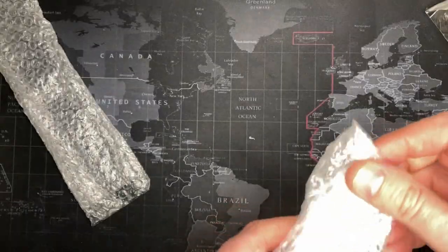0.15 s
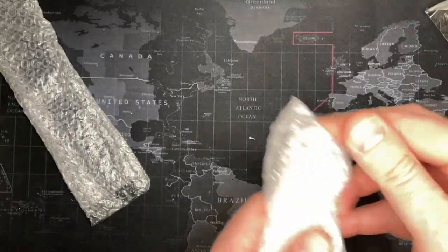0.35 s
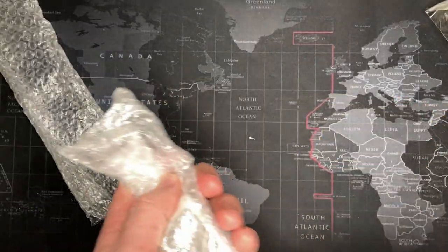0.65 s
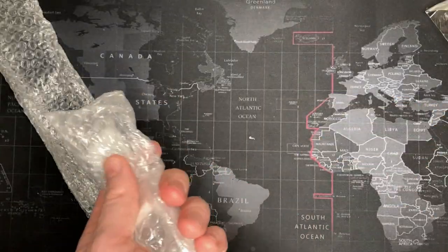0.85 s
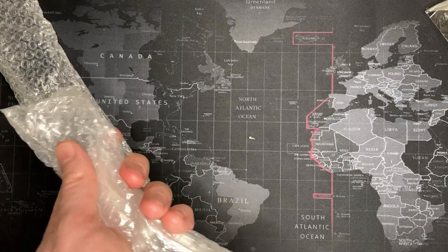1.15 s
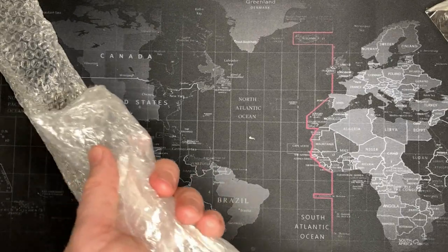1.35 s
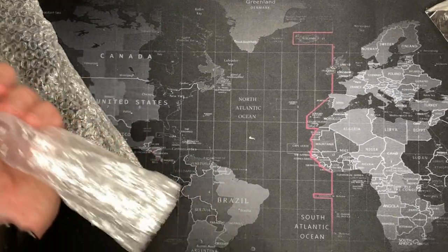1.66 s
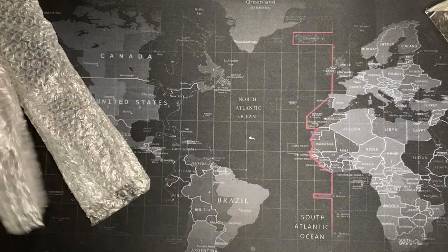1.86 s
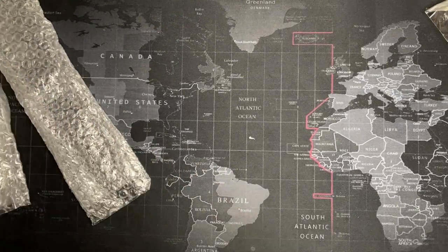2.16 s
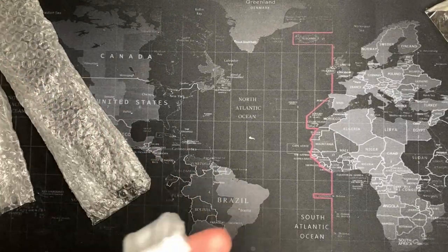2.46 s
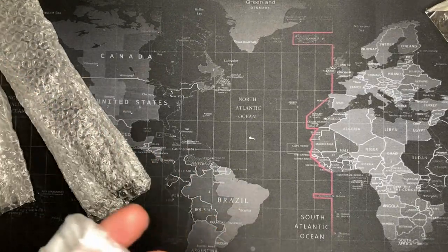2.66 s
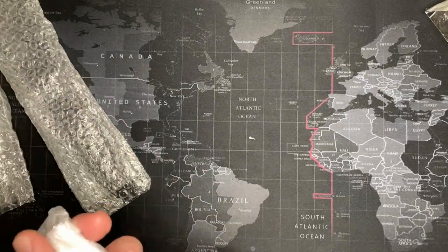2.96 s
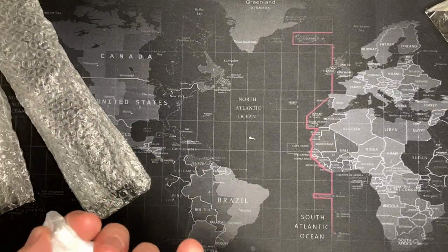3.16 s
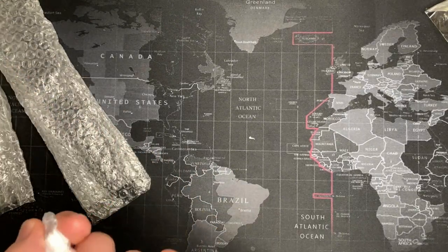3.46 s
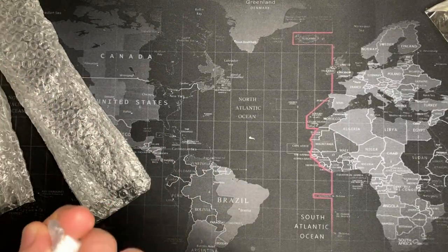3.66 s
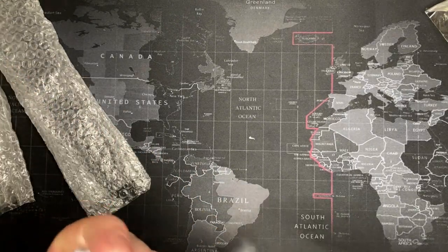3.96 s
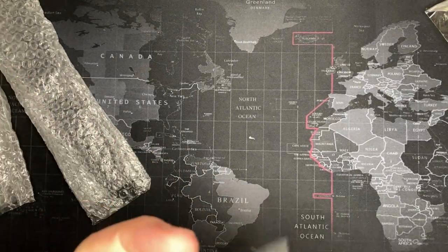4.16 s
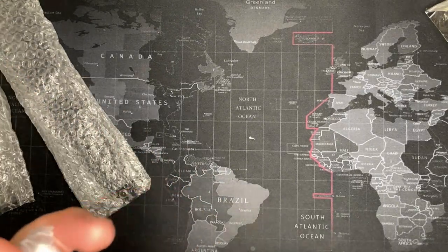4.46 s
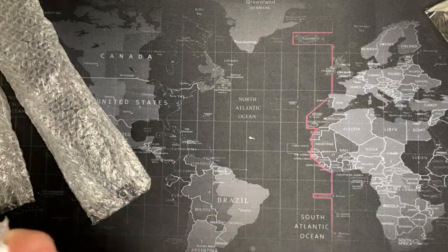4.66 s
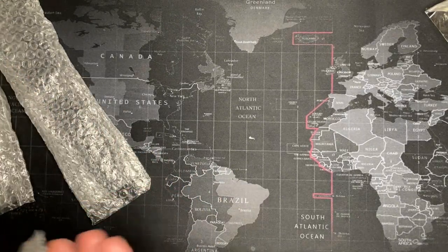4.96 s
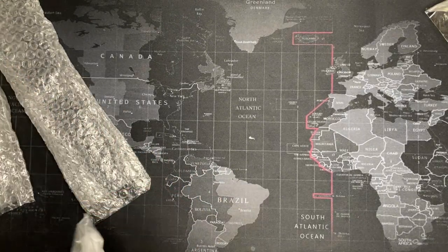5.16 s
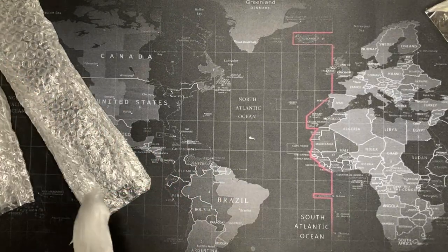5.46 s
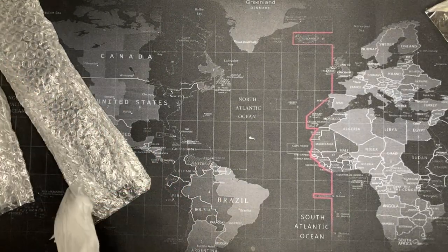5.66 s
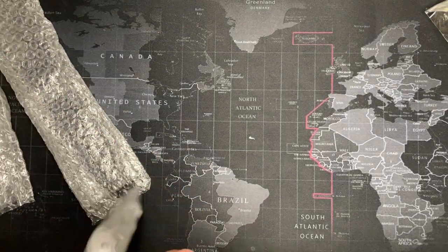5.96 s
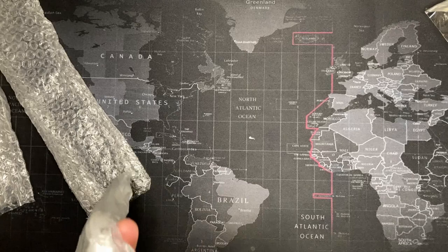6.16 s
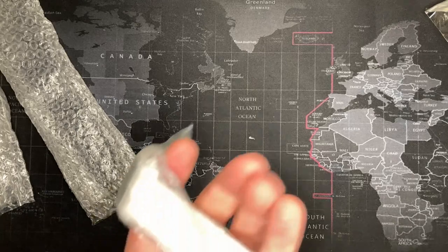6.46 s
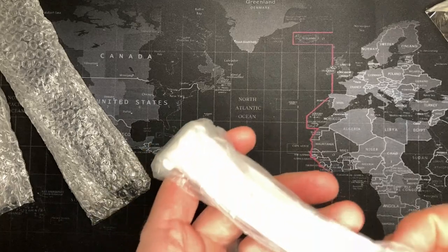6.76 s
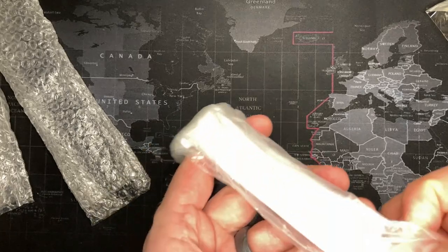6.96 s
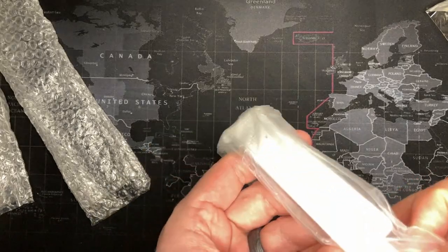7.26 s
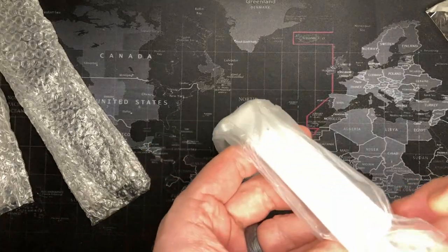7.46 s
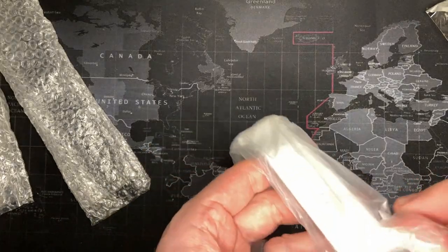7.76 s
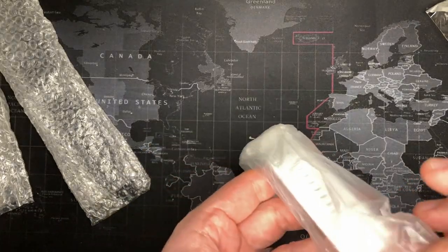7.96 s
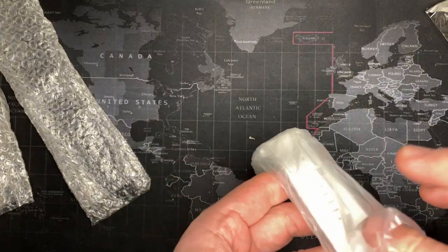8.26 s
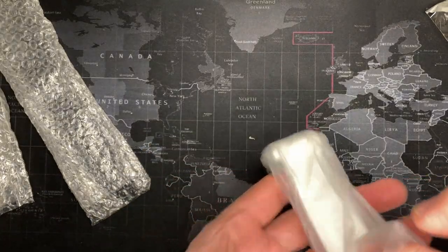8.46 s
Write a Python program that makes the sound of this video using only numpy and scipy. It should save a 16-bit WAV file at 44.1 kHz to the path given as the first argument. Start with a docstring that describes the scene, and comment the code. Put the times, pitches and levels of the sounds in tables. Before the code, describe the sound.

Hands work a thin plastic sleeve and bubble wrap over a desk mat, very close to a stereo microphone in a quiet room. From 0 s, bright dry crackle of tiny buckling creases, with sharp snaps and duller finger rustle, comes in uneven stretches, dipping briefly near 0.7 s. It rises again around 1.5 s, and a low rumble swells near 1.7 s as something touches the desk. The crackle thins around 2 s, bursts back at about 2.25 s, and continues moderately with scattered clicks. From 3.7 to 4.9 s it is strong and dense, with loud snaps. A softer, sparser rustle follows until about 6 s. Firm crinkling then returns, with hard snaps around 6.7 and 7.5 to 7.8 s and small crunchy bumps. From 7.9 s short, choppy crackles continue to the end at about 8.6 s, over faint low room tone and hiss.

```python
"""Hands squeeze, turn and slide bubble wrap and a thin plastic sleeve over a desk mat, close to a stereo microphone.
The film crackles from the start as swarms of tiny creases buckle, with sharper snaps, dull rustle and soft bumps.
The room's low rumble swells near 1.7 s; the crackle thins around 2 s, then grows and is strong from 3.7 to 4.9 s.
A softer stretch follows to about 6 s; then firm crackle and loud snaps return, and short, choppy crackle ends it.
Creases and snaps are noise bursts tinted by patches of film, the bumps are ringing puffs, the room is shaped noise."""
import sys
import numpy as np
from scipy import signal
from scipy.fft import rfft, irfft, next_fast_len
from scipy.io import wavfile
from scipy.ndimage import uniform_filter1d, map_coordinates

SR = 44100
rng = np.random.default_rng(int(sys.argv[2]) if len(sys.argv) > 2 else 0)


def master(y):
    """Save y as 16-bit WAV."""
    cut = np.clip(np.atleast_2d(y).T, -1, 1)
    pcm = np.round(cut * 32767)  # scale
    wavfile.write(sys.argv[1], SR, pcm.astype(np.int16))


N = 380141
PIVOT_DB = -26.5   # crackle level about which rustle level and crease rate swing


def handling():
    """Crackle level in dB: stretches slide from one level to another; the louder wins where they meet."""
    # crackle level in stretches: start [t/s], length [t/s], level at start [level/dB], level at end [level/dB]
    stretches = [(0.002, 0.2, -41.5, -33), (0.197, 0.16, -36.5, -40.0), (0.323, 0.23, -34.0, -36.5),
                 (0.575, 0.09, -35.5, -48.5), (0.669, 0.21, -51, -33.5), (0.867, 0.39, -33.5, -36.5),
                 (1.19, 0.07, -30.5, -37), (1.255, 0.25, -40.5, -28.5), (1.486, 0.36, -28, -33.5),
                 (1.83, 0.016, -43, -45), (1.854, 0.054, -34, -45.5), (1.915, 0.12, -37, -44),
                 (2.231, 0.043, -42, -24.5), (2.274, 0.14, -30, -26.5), (2.41, 0.16, -27, -30),
                 (2.56, 0.2, -36.5, -35.5), (2.712, 0.152, -33.0, -36.5), (2.871, 0.068, -30.0, -39.5),
                 (2.935, 0.097, -35.5, -34.5), (3.04, 0.13, -37, -34.5), (3.165, 0.24, -39, -39),
                 (3.434, 0.062, -37, -26.5), (3.513, 0.091, -26.5, -42), (3.606, 0.1, -42.5, -30.5),
                 (3.709, 0.056, -32, -37), (3.761, 0.057, -37.5, -25.0), (3.817, 0.09, -32.5, -22.5),
                 (3.912, 0.036, -29, -41), (3.955, 0.059, -27.5, -27.5), (4.02, 0.063, -34.5, -45.5),
                 (4.109, 0.056, -32.5, -42), (4.167, 0.029, -32, -47), (4.204, 0.037, -32, -23),
                 (4.246, 0.28, -23.5, -30.5), (4.497, 0.4, -24.0, -39), (4.871, 0.085, -34.5, -28.5),
                 (4.963, 0.13, -31.5, -34), (5.096, 0.1, -30, -37.5), (5.202, 0.16, -35.5, -33.0),
                 (5.366, 0.031, -43.5, -36), (5.403, 0.087, -32.5, -38.5), (5.479, 0.16, -32.5, -43),
                 (5.636, 0.19, -42.0, -38), (5.817, 0.24, -40.5, -30.5), (6.046, 0.059, -33, -38),
                 (6.113, 0.2, -38.5, -28.5), (6.322, 0.062, -32, -32), (6.383, 0.17, -28, -37),
                 (6.526, 0.26, -27.5, -30.5), (6.775, 0.108, -39.5, -25), (6.891, 0.039, -25.5, -33.5),
                 (6.94, 0.071, -44, -39.5), (6.992, 0.19, -44.5, -27.5), (7.184, 0.095, -32.5, -31),
                 (7.289, 0.052, -27, -42.5), (7.353, 0.095, -30, -41), (7.436, 0.12, -40, -29.5),
                 (7.577, 0.29, -26.0, -41.5), (7.89, 0.016, -39, -42), (7.916, 0.053, -43, -35),
                 (7.974, 0.028, -36.5, -32.5), (8.004, 0.018, -31.5, -36), (8.032, 0.048, -37.0, -33),
                 (8.084, 0.018, -32, -34), (8.104, 0.035, -35.5, -36.5), (8.14, 0.018, -37.0, -36),
                 (8.155, 0.12, -32, -29), (8.287, 0.097, -36, -32.5), (8.38, 0.021, -35.5, -36),
                 (8.402, 0.027, -35, -41.5), (8.433, 0.053, -44, -27), (8.486, 0.079, -28, -35.5),
                 (8.576, 0.016, -37, -37), (8.598, 0.02, -37, -33)]
    rise_db_per_s, fall_db_per_s = 1500, 1200   # slopes before and after a stretch
    at_rest_db = -47.5   # lowest level, the film merely held
    t = np.arange(0, N + 32, 32) / SR
    level_db = np.full(len(t), at_rest_db)
    for start, length, start_db, end_db in stretches:
        end = start + length
        slide_db = np.interp(t, [start, end], [start_db, end_db])
        rise_db = rise_db_per_s * np.maximum(start - t, 0)
        fall_db = fall_db_per_s * np.maximum(t - end, 0)
        level_db = np.maximum(level_db, slide_db - rise_db - fall_db)
    return np.interp(np.arange(N) / SR, t, level_db)


def film_crackle(crackle_db, full_db):
    """Thin film buckles crease by crease in short bright bursts; creases crowd as the crackle grows louder."""
    # spectrum of the crackling film before its fullness: frequency [f/Hz], gain [level/dB]
    film_spectrum = [(500, -36), (1200, -7.5), (2000, -10.5), (4000, -5.5), (6500, -6.5), (7800, -3.5),
                     (8300, 0.2), (10500, 0.05), (13000, -2), (16000, 2.5)]
    creases_per_s, follow = 3000, 0.3   # mean rate at the pivot level; dB of rate per dB of crackle
    per_s = creases_per_s * amp(follow * (crackle_db - PIVOT_DB))
    # the wide spread makes creases differ in strength
    creases = swarm(per_s, spread_db=3.9, clump_db=1.0, burst_ms=0.43,
                    low_hz=2070, high_hz=12400, even_s=0.0294)
    film = colour(creases, film_spectrum)
    film = film + (amp(full_db) - 1) * resonate(film, 2250, 3000)
    return amp(crackle_db) * film


def swarm(per_s, spread_db, clump_db, burst_ms, low_hz, high_hz, even_s):
    """Creases buckle in clumps: each is a swelling and dying noise burst, tinted by the patch of film it shakes."""
    busy = amp(clump_db * (drift(60) + drift(14)))
    happens = rng.random(N) < per_s * busy / SR
    power = happens * amp(2 * spread_db * np.minimum(rng.exponential(1, N), 4.0))
    patches = np.geomspace(low_hz, high_hz, num=8)
    dealt = rng.integers(0, 8, N)   # which patch each crease shakes
    fade = np.exp(-2000 / (burst_ms * SR))   # of power, twice as fast as amplitude
    out = np.zeros(N)
    for k, hz in enumerate(patches):
        envelope = np.sqrt(signal.lfilter([1], [1, -2 * fade, fade ** 2], power * (dealt == k) + 1e-12))
        burst = envelope * rng.standard_normal(N)
        tinted = resonate(burst, hz, 0.55 * hz) * np.sqrt(high_hz / hz)
        out += 0.15 * burst + tinted
    # slow chance swells of the random bursts are evened, so the level follows the curve applied afterwards
    return out / np.sqrt(uniform_filter1d(out ** 2, int(even_s * SR)) + 1e-9)


def ticks(crackle_db):
    """Lone sharp bright creases: random clicks of dying noise over the whole range, then weighted to the treble."""
    per_s, spread_db, burst_ms = 300, 1.5, 0.18
    from_hz, below_crackle_db = 4460, -0.5
    happens = rng.random(N) < per_s / SR
    sizes = happens * amp(spread_db * np.minimum(rng.exponential(1, N), 4))
    fade = np.exp(-1000 / (burst_ms * SR))
    clicks = signal.lfilter([1], [1, -fade], sizes + 1e-9) * rng.standard_normal(N)
    bright = colour(clicks, [(from_hz / 4, -30), (from_hz, -6), (10500, 0.5), (16000, 1.5)])
    return amp(crackle_db + below_crackle_db) * bright


def chance_snaps(crackle_db):
    """Times and levels of further snaps at random moments, their strength led by the crackle level there."""
    per_s, over_crackle_db, spread_db = 20, -5.5, -2.5
    when, size = rng.random((400, 2))[:int(per_s * N / SR)].T
    around_db = crackle_db[(when * N).astype(int)]
    # log of a uniform draw is negative, so the negative spread lifts a few snaps far up
    level_db = around_db + over_crackle_db + spread_db * np.log(size + 1e-3)
    return np.transpose([when * N / SR, level_db])


def snaps(crackle_db):
    """A sharp click tinted by its patch of film and a short noisy burst, amid ragged lesser shocks before and after."""
    # the snaps that stand out most from the crackle around them, ahead of the path gains:
    # time [t/s], energy as a level over 2 ms [level/dB]
    clear_snaps = [(0.0499, -29.0), (0.3354, -25.0), (0.395, -28.5), (0.494, -28.0), (0.5646, -29.5),
                   (0.7188, -36.5), (0.734, -35.0), (0.7703, -33.5), (0.7852, -34.5), (0.8823, -23.5),
                   (0.8958, -23.5), (1.0231, -27.0), (1.3122, -28.5), (1.6104, -22.5), (1.6883, -23.5),
                   (1.7521, -27.0), (1.8043, -25.0), (1.8782, -30.5), (1.9306, -29.0), (1.9948, -29.5),
                   (2.0451, -35.0), (2.0651, -40.0), (2.0849, -37.0), (2.1403, -31.0), (2.1772, -33.5),
                   (2.2134, -30.5), (2.5846, -26.0), (2.6392, -27.0), (2.789, -27.5), (2.8482, -27.0),
                   (2.8702, -21.0), (2.8757, -24.0), (2.9049, -26.0), (2.9412, -24.0), (3.0339, -24.5),
                   (3.1211, -28.5), (3.1663, -30.0), (3.2071, -31.5), (3.214, -27.5), (3.2418, -28.0),
                   (3.3426, -29.0), (3.4169, -33.0), (3.4371, -25.5), (3.4817, -22.0), (3.5152, -20.5),
                   (3.5524, -25.0), (3.571, -30.5), (3.5844, -31.0), (3.6185, -31.0), (3.6532, -24.5),
                   (3.8405, -24.5), (3.925, -27.5), (3.9742, -22.0), (3.9818, -20.0), (4.0213, -26.0),
                   (4.0712, -26.0), (4.1054, -22.5), (4.1268, -25.5), (4.1448, -28.5), (4.1646, -30.5),
                   (4.1835, -25.0), (4.2384, -18.5), (4.3641, -20.0), (4.3879, -19.5), (4.4034, -21.5),
                   (4.491, -19.0), (4.6753, -21.0), (4.8296, -28.0), (4.8474, -27.0), (5.2204, -30.5),
                   (5.2296, -28.0), (5.3112, -27.5), (5.4285, -24.0), (5.4819, -28.5), (5.5863, -32.0),
                   (5.6357, -32.5), (5.646, -33.0), (5.6715, -31.5), (5.7417, -25.5), (5.8679, -29.0),
                   (5.8837, -27.5), (5.9011, -29.0), (5.9903, -26.0), (6.0347, -24.0), (6.0462, -24.0),
                   (6.0714, -26.5), (6.1771, -28.0), (6.1925, -27.5), (6.376, -25.0), (6.4824, -22.5),
                   (6.5034, -29.5), (6.534, -23.5), (6.7051, -22.5), (6.7154, -21.0), (6.7442, -21.0),
                   (6.8273, -30.0), (6.8427, -21.5), (6.8902, -21.0), (6.9286, -27.5), (6.9532, -27.5),
                   (6.9644, -30.0), (6.991, -29.0), (7.0045, -26.5), (7.0253, -30.5), (7.071, -27.5),
                   (7.0805, -29.0), (7.0999, -25.5), (7.2865, -21.0), (7.3582, -21.5), (7.4599, -28.5),
                   (7.4732, -29.5), (7.4854, -24.0), (7.4937, -27.5), (7.5194, -28.0), (7.529, -21.0),
                   (7.5702, -19.0), (7.6302, -20.0), (7.645, -22.5), (7.6737, -23.5), (7.7066, -27.0),
                   (7.7671, -18.0), (7.7972, -29.0), (7.8179, -32.5), (7.8667, -30.0), (7.8959, -31.5),
                   (7.9205, -21.5), (8.037, -31.0), (8.0705, -22.0), (8.0943, -27.5), (8.1484, -24.5),
                   (8.1888, -24.5), (8.279, -24.5), (8.3016, -26.5), (8.3446, -26.5), (8.4015, -30.0),
                   (8.4244, -32.5), (8.4608, -28.0), (8.5451, -23.0), (8.5784, -27.5)]
    rows = [*chance_snaps(crackle_db), *clear_snaps]
    burst_ms, swell_ms, before_ms, after_ms = 0.69, 0.5, 8.2, 8.5   # decay and rise times
    fuzz, edge, ring, shock_db = 0.25, 0.98, 2.5, -16.5
    lead, window = 256, .002 * SR   # samples
    tints = 11300 * 2 ** (rng.random(len(rows)) - .6)   # Hz
    out = np.zeros(N + 2048)
    t = (np.arange(1024) - lead) / SR
    noise, chance = np.moveaxis(rng.standard_normal((len(rows), 2, 1024)), 1, 0)
    size = np.abs(chance)
    near = np.exp(-np.abs(t) * 1000 / np.where(t < 0, before_ms, after_ms))
    shocks = amp(shock_db) * size * (size > 2.4) * near   # only rare large draws
    swell = (t < 0) * np.exp(np.minimum(t, 0) * 1000 / swell_ms)
    fade = np.exp(-1000 / (burst_ms * SR))
    envelope = swell + signal.lfilter([1], [1, -fade], shocks + (t == 0))
    bursts = fuzz * noise * envelope + (t == 0)
    thin = signal.butter(2, 2500, "high", fs=SR, output="sos")   # thin film radiates no bass
    for (s, level_db), hz, burst in zip(rows, tints, bursts):
        tinted = edge * np.diff(burst, prepend=0) + ring * resonate(burst, hz, 0.45 * hz)
        hit = signal.sosfilt(thin, tinted)
        out[round(s * SR):][:1024] += amp(level_db) * hit * np.sqrt(window / np.sum(hit ** 2))
    return out[lead:lead + N]


def rustle(crackle_db, rustle_db, bass_db):
    """Fingers and wrapped item rub more dully: longer, lower bursts that follow most of the crackle's swing."""
    # spectrum of the rubbing before its bass: frequency [f/Hz], gain [level/dB]
    rub_spectrum = [(80, -19), (180, -12), (400, -5.5), (800, -0.5), (1400, 3.5), (2200, 7.5), (4000, -49)]
    follow = 0.89   # share of the crackle's swing about the pivot level
    rubs = swarm(600, spread_db=2.0, clump_db=4, burst_ms=3.9, low_hz=200, high_hz=1660, even_s=0.12)
    rub = colour(rubs, rub_spectrum)
    rub = rub + (amp(bass_db) - 1) * resonate(rub, 200, 295)
    return amp(PIVOT_DB + follow * (crackle_db - PIVOT_DB) + rustle_db) * rub


def bumps():
    """A dying puff of noise rings briefly at the pitch of each bump, with a broad crack above."""
    # soft bumps and crunches of fingers and item: time [t/s], peak before the common lift [level/dB], pitch [f/Hz]
    touches = [(0.228, -50, 213), (0.335, -34, 328), (1.472, -43, 550), (1.801, -49, 330),
               (1.984, -48, 700), (2.264, -45, 751), (2.725, -47, 780), (3.372, -46, 600),
               (3.782, -42, 830), (4.236, -44, 870), (4.819, -49, 520), (5.224, -44, 865),
               (5.403, -48.5, 791), (6.831, -40, 1330), (6.869, -43, 1420), (6.875, -43.5, 516),
               (6.965, -45.5, 810), (7.138, -50, 373), (7.351, -45, 820), (7.616, -46, 587),
               (7.62, -34, 2200), (7.671, -38, 1510), (7.735, -46, 400), (7.753, -38, 1200),
               (7.77, -43, 700), (7.894, -46, 510), (8.01, -36, 2100), (8.04, -41, 1230),
               (8.067, -41, 1280), (8.09, -47, 355), (8.147, -46, 417), (8.307, -45.5, 783),
               (8.478, -49, 899)]
    burst_ms, width, crack, lift_db = 8.0, 0.44, 0.5, 12.0   # width as a share of the pitch
    out = np.zeros(N + 2048)
    t = np.arange(2048) / SR
    puffs = rng.standard_normal((len(touches), 2048)) * np.exp(-t * 1000 / burst_ms)
    for (s, peak_db, hz), puff in zip(touches, puffs):
        hit = resonate(puff, hz, width * hz) + crack * resonate(puff, 3.2 * hz, 5 * hz)
        out[round(s * SR):][:2048] += amp(peak_db + lift_db) * hit / np.abs(hit).max()
    return out[:N]


def scatter(x, echo_db, t60, hold_s, flat):
    """x with reflections off moving hands and film, twice: each short stretch meets a new random set of them.
    flat = 1 keeps only their phase shifts, 0 their colour too."""
    bend_hz = 1260   # sound below this bends round the hands
    hop, length, lead = int(hold_s * SR), 2048, 1024
    steps, size = N // hop + 2, next_fast_len(2 * hop + length + lead)
    padded = np.concatenate([np.zeros(hop), x, np.zeros(3 * hop)])
    stretches = np.arange(steps)[:, None] * hop + np.arange(2 * hop)
    pieces = padded[stretches] * np.hanning(2 * hop)
    decay = amp(-60 * np.arange(length) / SR / t60)
    echoes = rng.standard_normal((2, 400, length))[:, :steps] * decay
    echoes = rfft(echoes / np.sqrt(np.sum(echoes ** 2, axis=-1, keepdims=True)), size)
    hz = np.arange(size // 2 + 1) * SR / size
    # long waves are hardly scattered
    path = 1 + amp(echo_db) * echoes * hz / np.hypot(hz, bend_hz)
    path = path / (np.abs(path) + 1e-6) ** np.clip(flat, 0, 1)
    # the lead makes room for what flattening spreads ahead of the sound
    wet = np.roll(irfft(rfft(pieces, size) * path, size), lead, axis=-1)
    out = np.zeros((2, steps * hop + size))
    for k in range(steps):
        out[:, k * hop:k * hop + size] += wet[:, k]
    return out[:, hop + lead:hop + lead + N]


def microphone_pair(x, direct, lag_ms, pan_db):
    """Below the treble the pair follows the hands by lag and level; the treble keeps one fixed pattern."""
    treble_from_hz, treble_lag_ms = 5810, 0.21935
    low = signal.butter(10, treble_from_hz, fs=SR, output="sos")
    high = signal.butter(10, treble_from_hz, "high", fs=SR, output="sos")
    left, right = direct + scatter(x, echo_db=3.0, t60=0.035, hold_s=.08, flat=1.0)
    placed = np.array([left, delayed(right, lag_ms)]) * amp([pan_db / 2, -pan_db / 2])
    body = signal.sosfilt(low, placed)
    # sum and difference of the pair are only partly alike
    treble = direct + scatter(x, echo_db=4.5, t60=0.035, hold_s=0.046, flat=0.5)
    for_sum, for_difference = signal.sosfilt(high, treble)
    # what the two share reaches the left channel inverted and late
    size = next_fast_len(N + 64)
    hz = np.arange(size // 2 + 1) * SR / size
    late = np.exp(-2j * np.pi * hz * treble_lag_ms / 1000)
    mid = irfft(rfft(for_sum, size) * (1 - late), size)[:N] / 2
    side = irfft(rfft(for_difference, size) * (1 + late), size)[:N] / 2
    return body + np.array([mid - side, mid + side])


def room_tone():
    """Low rumble over a faint hiss: shaped noise, nearly alike in both channels."""
    # rumble, swelling as things touch the desk, before the common lift: time [t/s], level [level/dB]
    rumble = [(0, -60.5), (.55, -59.5), (.7, -63.5), (1.4, -63.5), (1.66, -49), (1.76, -66.5), (2.3, -62),
              (2.75, -64), (4.3, -67.5), (4.7, -69), (6, -66), (7.1, -66.5), (8.62, -64.5)]
    # spectrum of the room: frequency [f/Hz], gain [level/dB]
    room_spectrum = [(20, -38), (35, -22), (52, -4), (70, -2), (90, -8.5), (120, -4), (160, -13),
                     (400, -14.5), (2000, -8.5), (16000, -47)]
    lift_db = 4.5
    mid, side = colour(rng.standard_normal((2, N)), room_spectrum)
    return amp(in_time(rumble)[0] + lift_db) * (mid + 0.13 * side * [[1], [-1]])


def amp(db):
    """Gain of a level in dB."""
    return 10 ** (np.asarray(db) / 20)


def rms_one(x):
    """Scaled to rms 1, over all channels together."""
    return x / np.sqrt(np.mean(x ** 2) + 1e-20)


def in_time(rows):
    """The columns of a curve, sample by sample."""
    s, *columns = np.transpose(rows)
    return [np.interp(np.arange(N) / SR, s, c) for c in columns]


def colour(x, points):
    """x through a smooth spectrum of (Hz, dB) points; rms 1."""
    size = next_fast_len(N)
    hz = np.maximum(np.arange(size // 2 + 1) * SR / size, 1)
    point_hz, point_db = np.transpose(points)
    gain = amp(np.interp(np.log(hz), np.log(point_hz), point_db))
    return rms_one(irfft(rfft(x, size) * gain, size)[..., :N])


def drift(rate):
    """Slow chance of spread 1: noise through a double low-pass at rate in Hz."""
    r = np.exp(-2 * np.pi * rate / SR)
    return rms_one(signal.lfilter([1], [1, -2 * r, r * r], rng.standard_normal(N + SR))[SR:])


def resonate(x, hz, width_hz):
    """One two-pole resonance, gain about 1 on top."""
    r = np.exp(-np.pi * width_hz / SR)
    poles = [1, -2 * r * np.cos(2 * np.pi * hz / SR), r * r]
    return signal.lfilter([(1 - r * r) / 2, 0, (r * r - 1) / 2], poles, x)


def delayed(x, lag_ms):
    """x read late; the lag may move."""
    return map_coordinates(x, [np.arange(N) - lag_ms * SR / 1000], order=3, mode="nearest")


def scene():
    """Crackle, snaps, rustle and bumps at the hands, over the room tone."""
    # hands: time [t/s], mean lag of the right channel below the treble [t/ms],
    # rustle relative to crackle at the pivot level [level/dB],
    # film fullness around 2.25 kHz [level/dB], rustle bass around 200 Hz [level/dB]
    hand_moves = [(0, 0.021, -14, 6, -4), (.4, 0.087, -15.5, 2.5, 4), (.9, 0.066, -15, 2, -8),
                  (1.5, 0.059, -13, 0, 0.5), (1.85, 0.037, -18.5, 0.5, 4), (2.2, 0.046, -18, 0, -0.5),
                  (2.8, 0.21, -17.5, 2, -5), (3.25, 0.21, -16.5, 1, -11), (3.8, 0.23, -23, 2, 0.5),
                  (4.3, 0.21, -24, -0.5, 4), (4.8, 0.27, -14.5, 5.5, -8.5), (5.3, 0.14, -19, -0.5, -2),
                  (5.8, 0.21, -19, 0.5, -1.5), (6.15, 0.14, -18.5, 0, 3.5), (6.5, 0.071, -21.5, -3, 0),
                  (6.9, 0.039, -20, -1, 0), (7.3, 0.03, -20, -1, 4), (7.6, 0.025, -18.5, -3, 2.5),
                  (7.9, 0.035, -14.5, -3, 1.5), (8.2, 0.036, -15.5, -1.5, 3), (8.4, 0.05, -21, -4, -6),
                  (8.62, 0.055, -16, 1.5, 4)]
    lag_ms, rustle_db, full_db, bass_db = in_time(hand_moves)
    crackle_db = handling()
    film = film_crackle(crackle_db, full_db)
    tick = ticks(crackle_db)
    snap = snaps(crackle_db)
    rub = rustle(crackle_db, rustle_db, bass_db)
    # snaps and ticks reach the microphone mostly straight; some snap scatters by way of the hands
    snap_direct_db, snap_scattered_db = 1, -8.5
    hands = film + rub + amp(snap_scattered_db) * snap + bumps()
    direct = amp(snap_direct_db) * snap + tick
    # creases come from all over the film, so the lag wanders by a share of itself
    wandering_lag_ms = lag_ms * (1 + 0.18 * drift(4.6))
    pan_db = 1.64 + 3.5 * lag_ms   # the left-right level grows with the lag
    return microphone_pair(hands, direct, wandering_lag_ms, pan_db) + room_tone()


def record(dry):
    """The top is cut steeply, 70 dB down from 16218 Hz."""
    return signal.sosfilt(signal.cheby2(16, 70, 16218, fs=SR, output="sos"), dry)


dry = scene()
out = record(dry)
master(out)
```